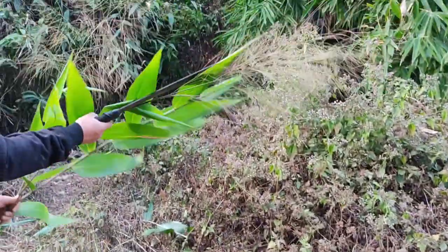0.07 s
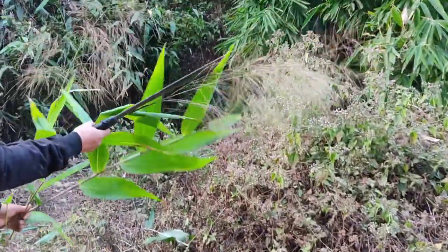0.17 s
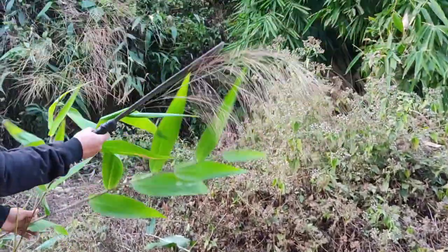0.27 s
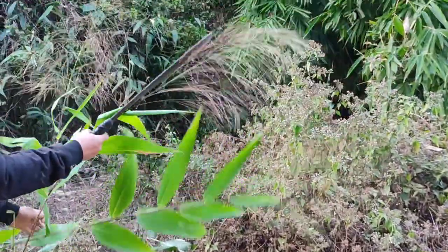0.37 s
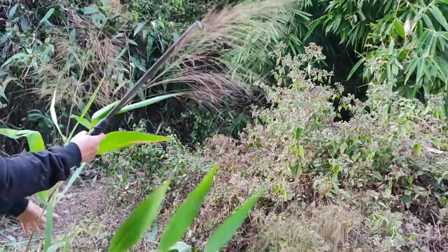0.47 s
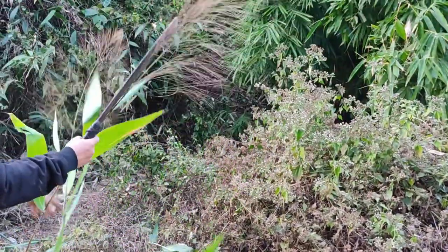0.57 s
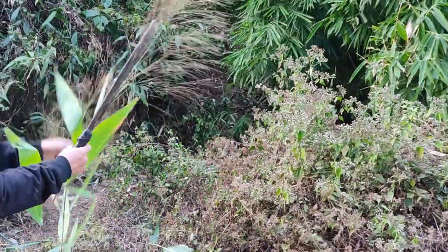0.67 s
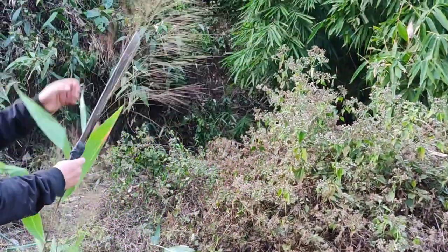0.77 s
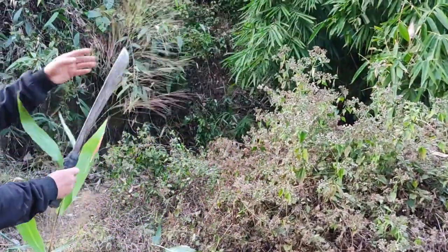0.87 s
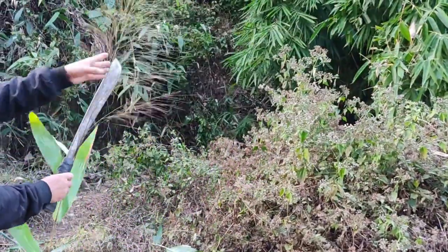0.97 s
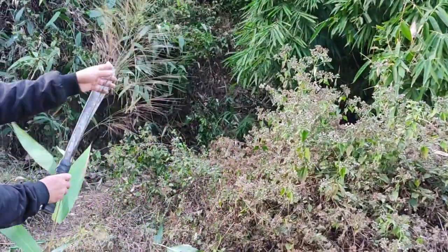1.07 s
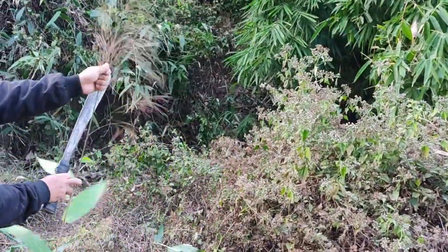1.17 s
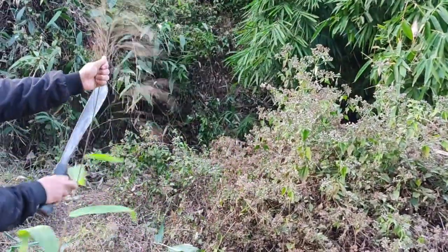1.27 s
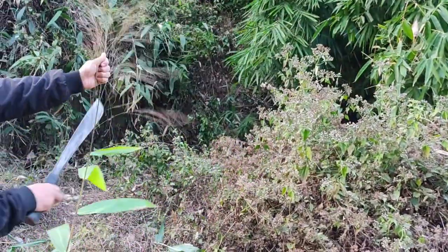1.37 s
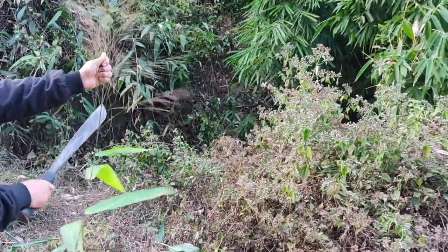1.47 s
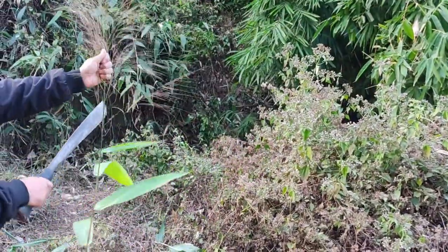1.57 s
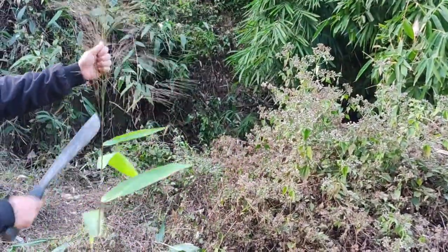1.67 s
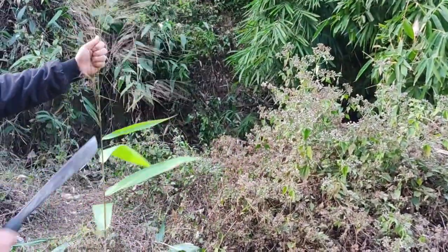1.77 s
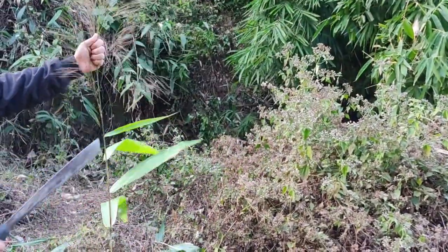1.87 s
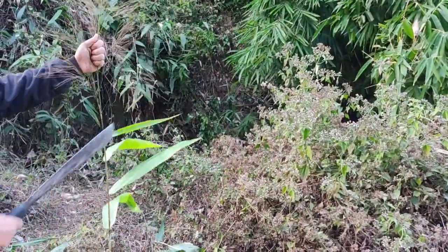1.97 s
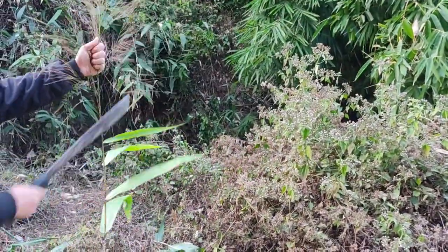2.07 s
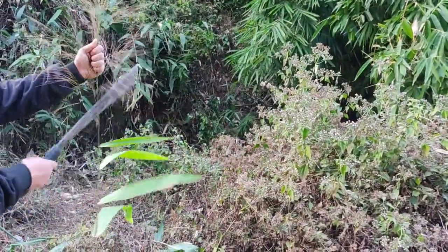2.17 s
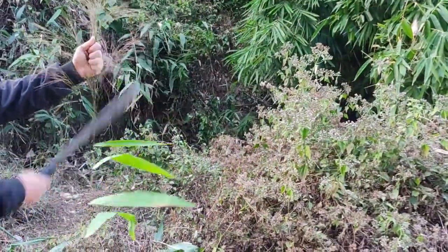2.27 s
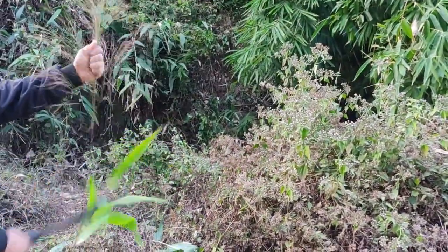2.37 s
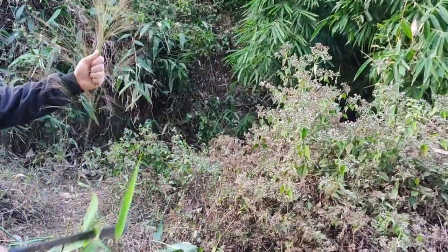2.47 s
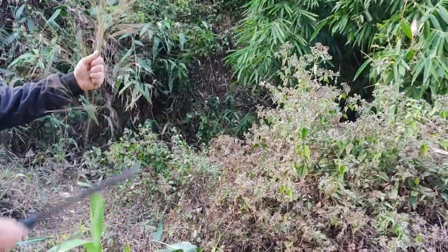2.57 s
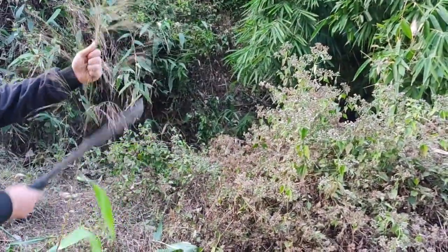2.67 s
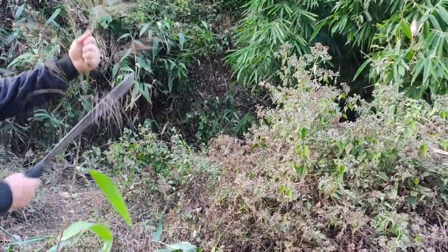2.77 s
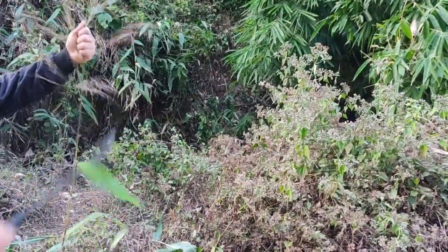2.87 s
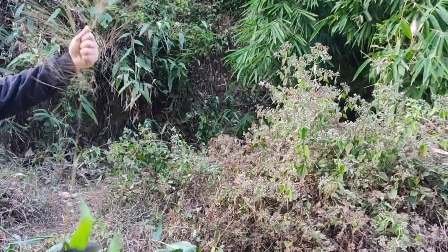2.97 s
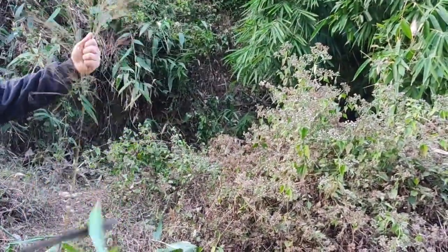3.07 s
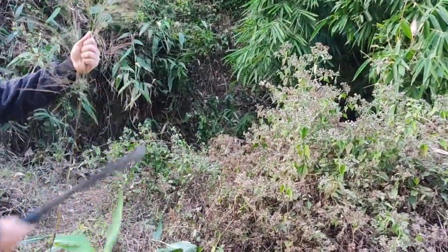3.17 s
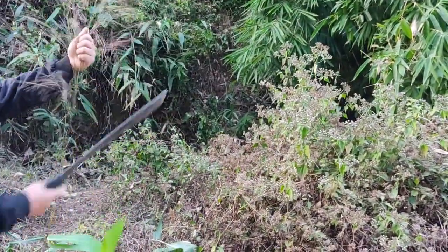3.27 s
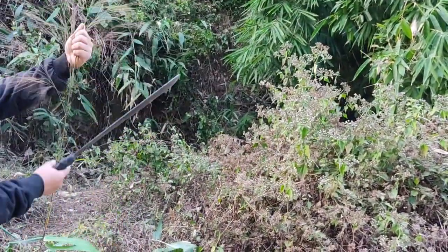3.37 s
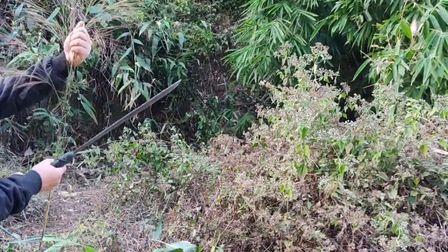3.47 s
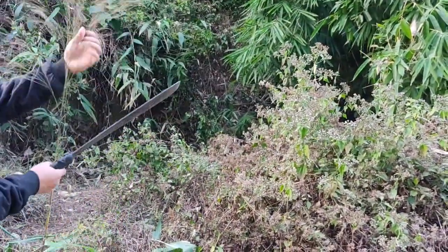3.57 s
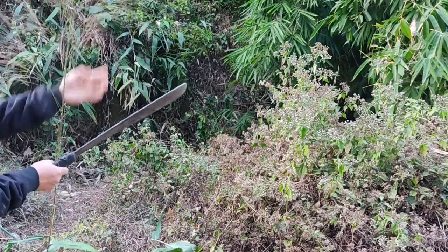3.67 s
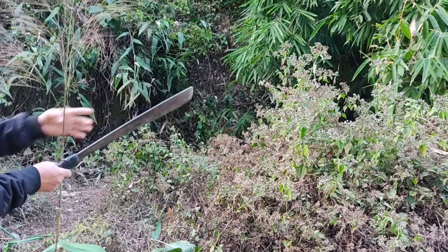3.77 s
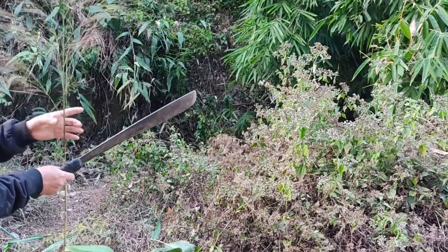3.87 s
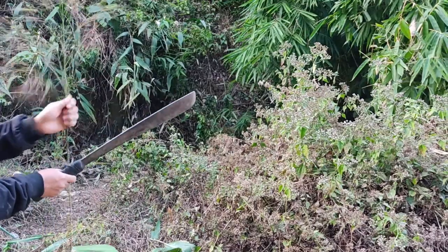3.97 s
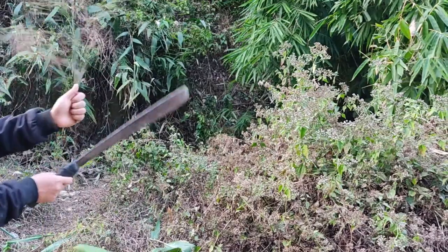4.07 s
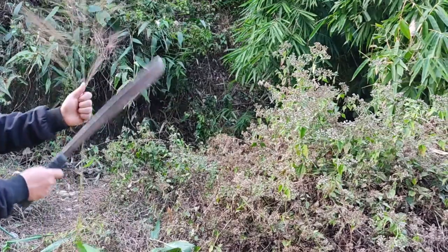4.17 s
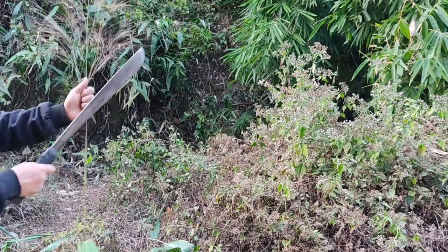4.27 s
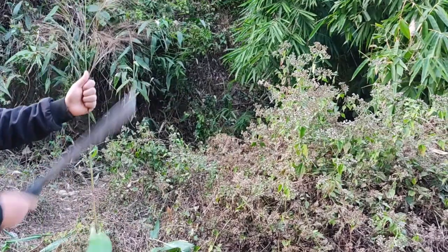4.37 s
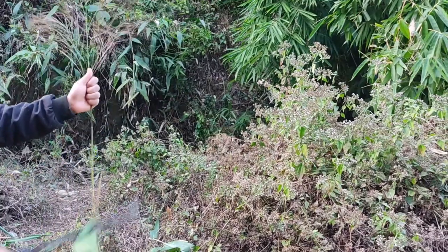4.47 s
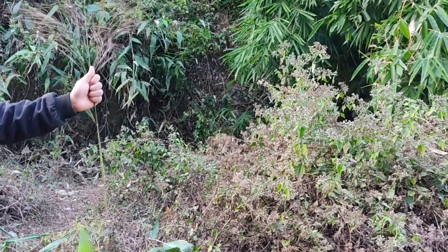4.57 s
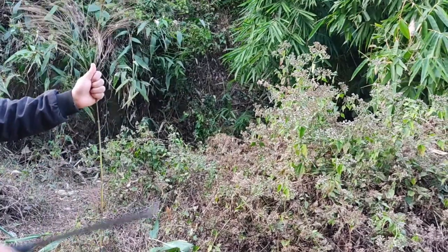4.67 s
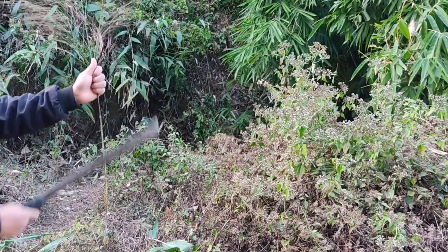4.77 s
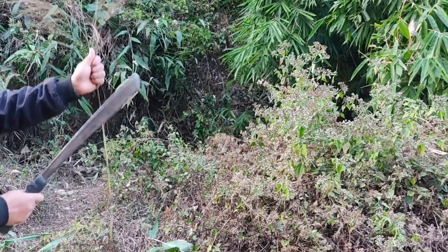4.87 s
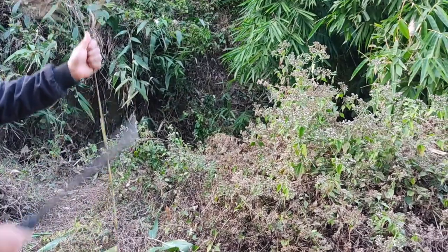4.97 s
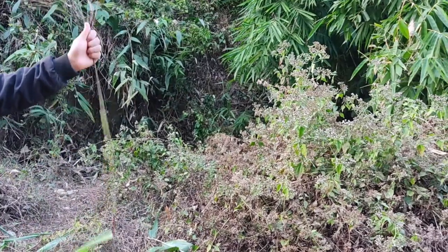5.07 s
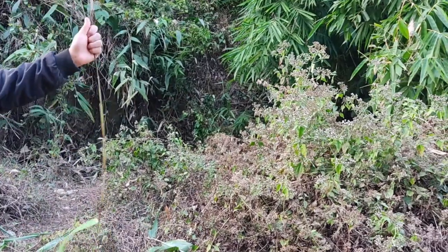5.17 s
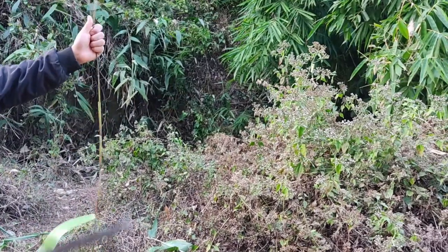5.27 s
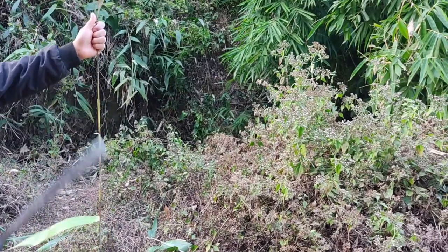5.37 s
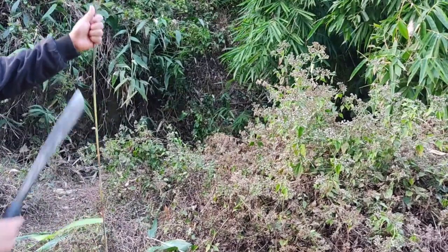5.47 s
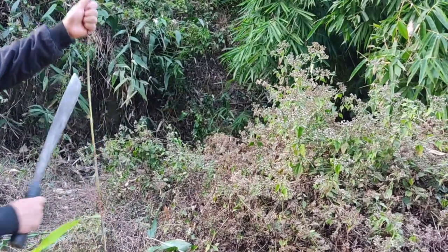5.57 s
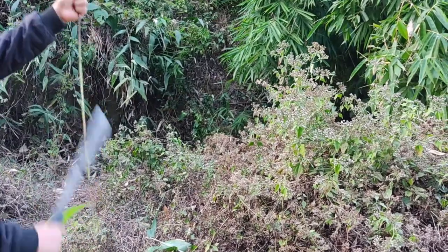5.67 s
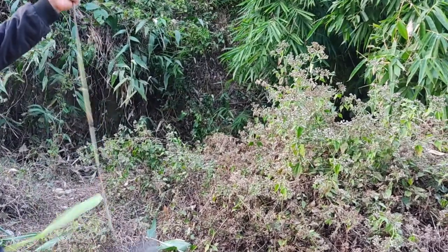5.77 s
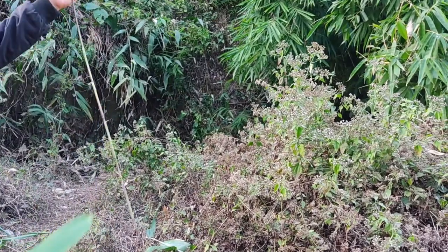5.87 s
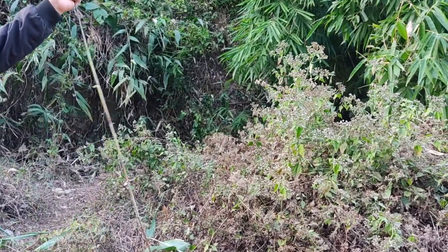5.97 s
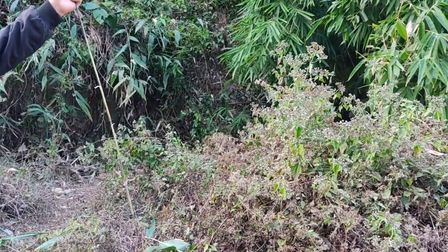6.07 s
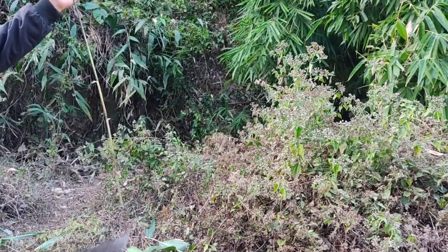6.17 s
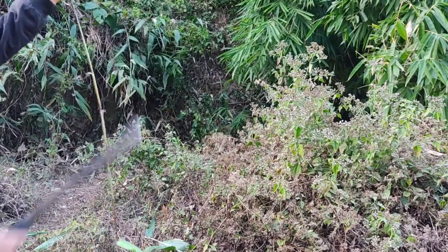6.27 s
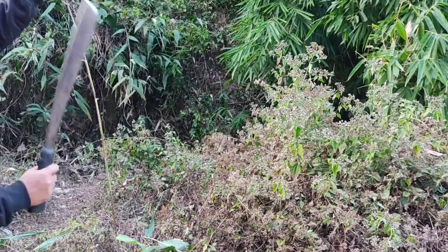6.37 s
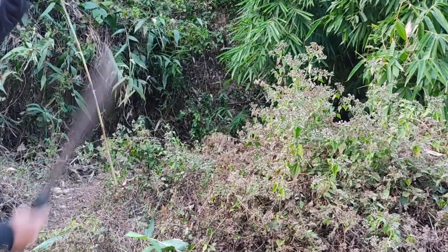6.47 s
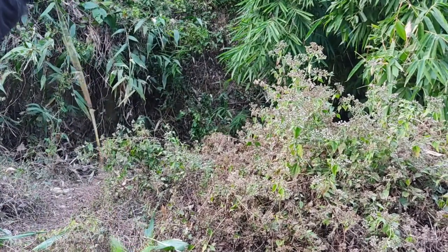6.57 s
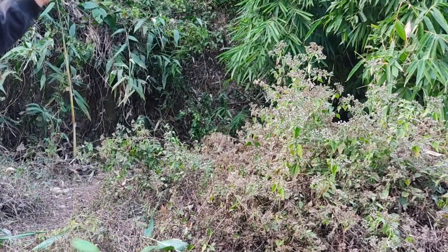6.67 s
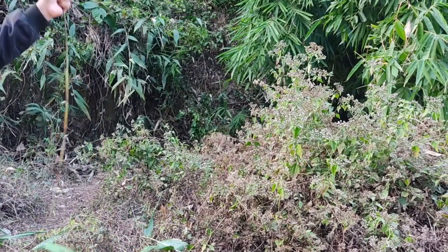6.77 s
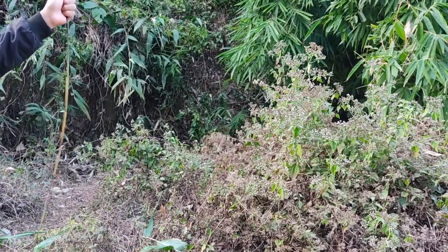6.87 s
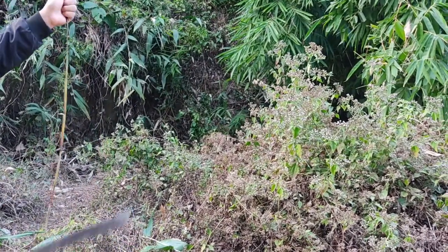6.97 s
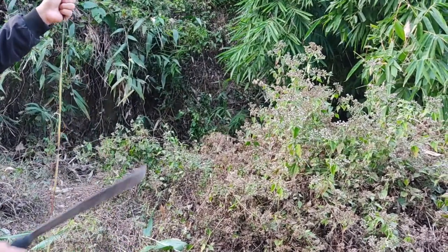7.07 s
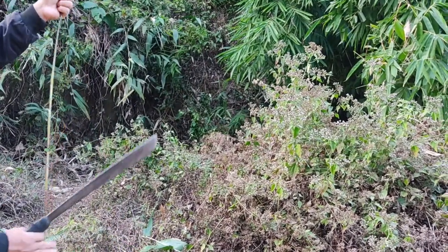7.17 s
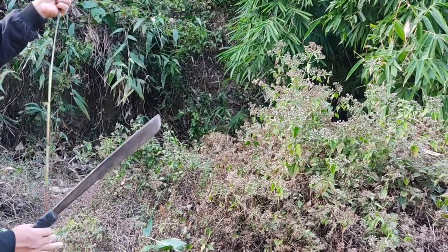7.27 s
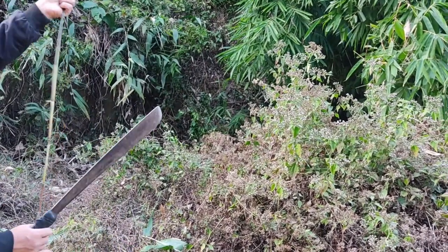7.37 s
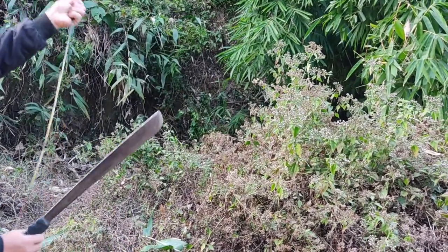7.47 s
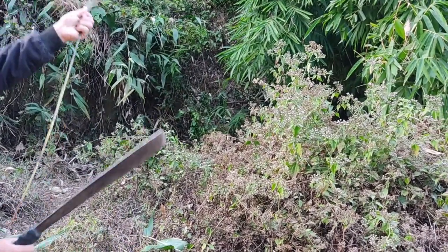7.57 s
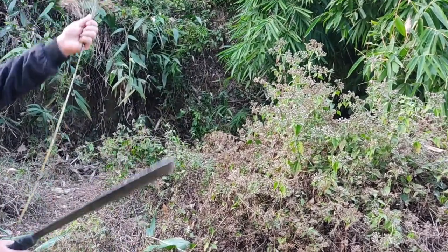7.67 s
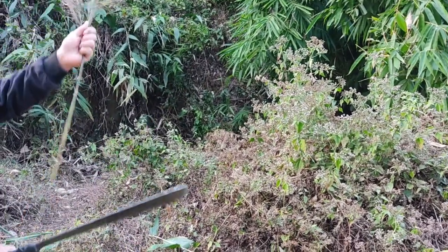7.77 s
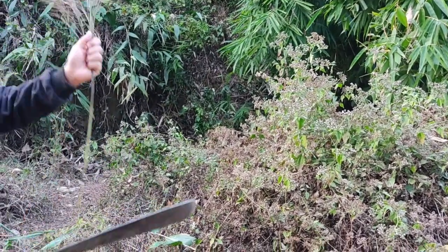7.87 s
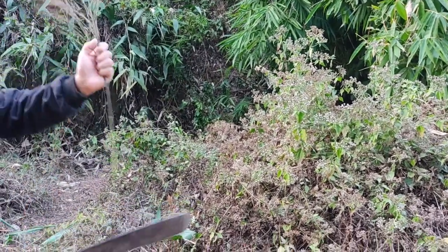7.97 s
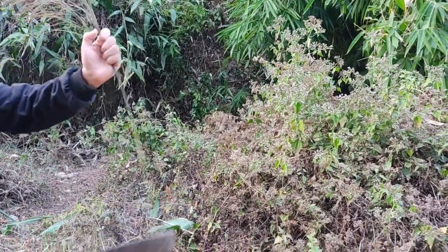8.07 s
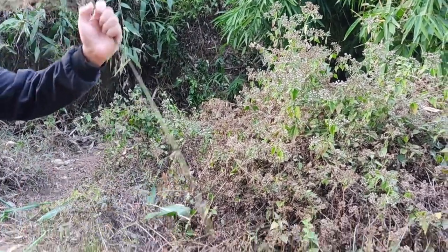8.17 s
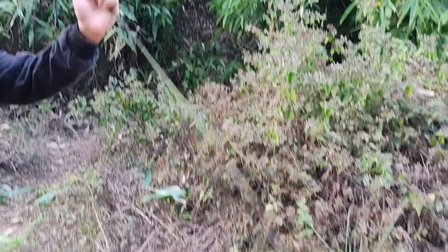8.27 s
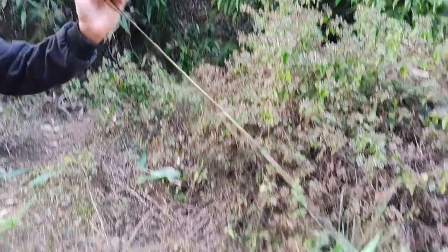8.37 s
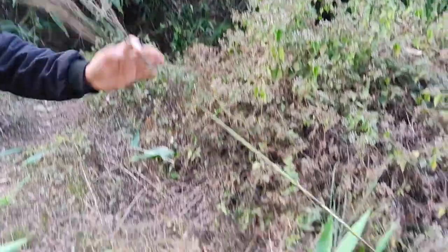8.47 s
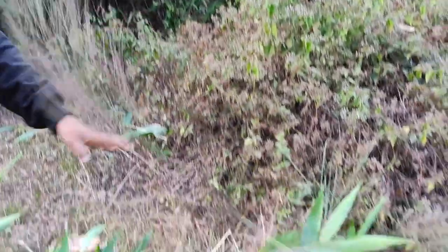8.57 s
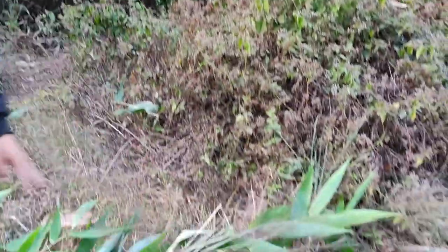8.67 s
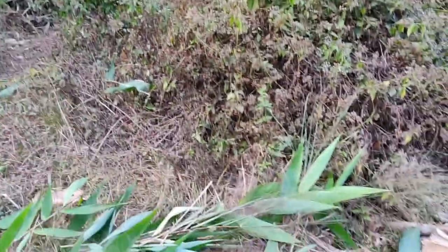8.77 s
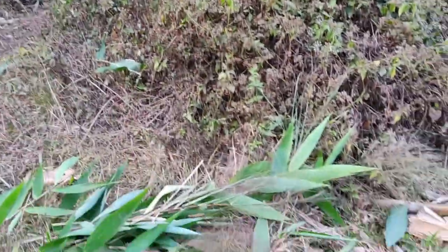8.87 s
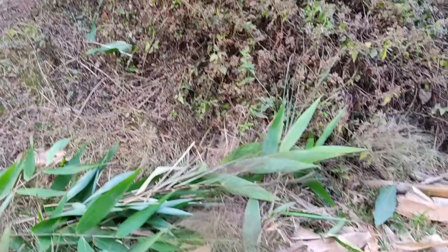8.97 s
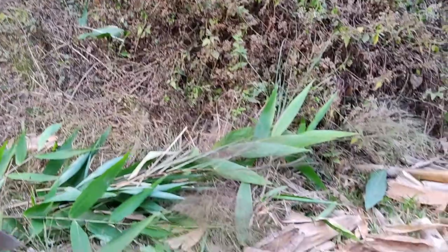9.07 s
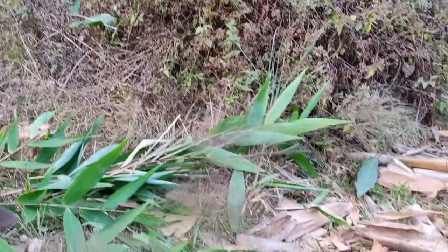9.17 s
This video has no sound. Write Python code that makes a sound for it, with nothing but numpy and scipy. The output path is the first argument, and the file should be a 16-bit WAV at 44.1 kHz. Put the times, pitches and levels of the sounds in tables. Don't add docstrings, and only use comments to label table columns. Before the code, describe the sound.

At a wood's edge, crickets sing in double chirps, fast trills and a lower drone above a faint insect chorus and soft wind rumble. Near the stereo phone microphone, leaves swish first, then a blade bites grass in short, dry, crunchy strikes. Two bursts of chopping are separated by quiet ticks; scattered later cuts give way to a thrown stalk rustling and knocking as it falls. Very little echo, only a short scatter from the bushes.

```python
import sys
import numpy as np
from scipy import signal
from scipy.fft import rfft, irfft, next_fast_len
from scipy.io import wavfile
from scipy.ndimage import uniform_filter1d, map_coordinates

SR = 44100
rng = np.random.default_rng(int(sys.argv[2]) if len(sys.argv) > 2 else 0)


def generate_wav(signal):
    frames = np.transpose(np.atleast_2d(signal))
    scaled = np.clip(frames, -1, 1) * 32767
    pcm = np.round(scaled).astype(np.int16)
    wavfile.write(sys.argv[1], SR, pcm)


def volts_from_db(level):
    exponent = np.asarray(level, float) / 20
    return 10 ** exponent


N = 406602

# pitch_hz, level_db [dB per Hz]
LEAF_COLOUR = [(2060, -52.5), (3500, -13), (4150, -15), (4910, -9), (5420, -11.5), (6460, -3.5),
               (7270, 0.5), (8790, -5.5), (9350, -14), (9900, -25), (11500, -24.5), (15000, -48.5),
               (22000, -120)]
# pitch_hz, level_db [dB per Hz]
STEM_COLOUR = [(50, -41), (130, -16.5), (386, -5.5), (606, -11), (827, -4), (1400, -6), (2380, -.3),
               (3300, -4), (4130, -9), (5000, -23), (6500, -44)]


def unit(x):
    return x / np.sqrt(np.mean(x ** 2) + 1e-20)


def along(points, hz):
    f, v = np.transpose(points)
    return np.interp(np.log(hz + 1), np.log(f + 1), v)


def wobble(rate):
    knots = rng.standard_normal(int(N * rate / SR) + 4)
    return map_coordinates(knots, [np.arange(N) * rate / SR])


def filtered(x, response):
    m = next_fast_len(N + 8192)
    return irfft(rfft(x, m) * response(np.fft.rfftfreq(m, 1 / SR)), m)[..., :N]


def causal(x, spectrum):
    gain = volts_from_db(along(spectrum, np.fft.rfftfreq(2048, 1 / SR)))
    c = irfft(np.log(gain + 1e-4))
    c[1:1024] *= 2
    c[1025:] = 0
    h = irfft(np.exp(rfft(c)))
    return signal.fftconvolve(x, h / np.linalg.norm(h))[:N]


def patches(x, size, bins, frames, patchy_db):
    z = signal.stft(x, nperseg=size)[2]
    field = uniform_filter1d(rng.standard_normal(z.shape[-2:]), bins, 0)
    field = uniform_filter1d(field, frames, 1)
    uneven = z * volts_from_db(patchy_db * unit(field))
    return unit(signal.istft(uneven, nperseg=size)[1][..., :N])


def air(spectrum, patchy_db):
    pair = patches(rng.standard_normal((2, N)), size=512, bins=5, frames=10, patchy_db=patchy_db)
    return unit(filtered(pair, lambda hz: volts_from_db(along(spectrum, hz))))


def wood():
    # pitch_hz, level_db [dB per Hz]
    chorus_colour = [(15, -38), (25, 4.5), (97, -4), (140, -10.5), (300, -8.5), (680, -17), (1300, -23),
                     (2300, -21.5), (4150, -22.5), (5100, -11.5), (5500, -1.5), (6200, -4.5), (7300, -13.5),
                     (9200, -27.5), (9900, -39), (12000, -41), (16000, -55.5)]
    # pitch_hz, level_db [dB per Hz]
    gust_colour = [(24, -27), (40, -9.5), (140, -4), (171, 1.5), (368, -3.5), (800, -10), (1500, -28),
                   (2640, -120)]
    # time_s, level_db
    wind_level = [(0, -66.5), (.54, -77), (1.08, -72), (1.4, -78), (2.31, -79), (2.54, -66.5), (2.7, -81),
                  (3.15, -74), (3.33, -78), (3.46, -71), (3.62, -79), (5.16, -70.5), (5.37, -80.5),
                  (6.3, -80), (6.91, -73), (7.37, -78), (8.2, -79), (8.35, -72), (8.6, -72), (8.95, -72),
                  (9.22, -67)]
    gust_db = np.interp(np.arange(N) / SR, *np.transpose(wind_level))
    chorus = volts_from_db(-65.5 + 1.1 * wobble(2.105)) * air(chorus_colour, patchy_db=1.5)
    gusts = volts_from_db(gust_db + 2.8 * wobble(8)) * air(gust_colour, patchy_db=2.5)
    return chorus + gusts


def chirps(times, db, top_hz, fall_hz, length, teeth, vary_db):
    out = np.zeros(N + SR)
    u = np.arange(round(length * SR)) / SR
    throb = 1 + teeth * np.cos(2 * np.pi * 82 * u)
    swell = np.sin(np.pi * u / length) ** .8 * throb
    for s, g, (jitter, size) in zip(times, db, rng.normal(size=(len(times), 2))):
        phase = 2 * np.pi * ((top_hz + 20 * jitter) * u - fall_hz * u * u / length / 2)
        start = max(round((s - length / 2) * SR), 0)
        out[start:][:len(u)] += volts_from_db(g + vary_db * size) * swell * np.sin(phase)
    return out[:N]


def phrases(table):
    rows = [(s, db) for a, b, period, db in table for s in np.arange(a, b, period)]
    return np.transpose(rows)


def from_side(x, late):
    return np.array([np.roll(x, late), x])


def crickets():
    # first_s, chirps [count]
    sweep_runs = [
        (.145, 1),
        (.429, 3),
        (1.486, 5),
        (2.785, 5),
        (4.097, 2),
        (4.615, 2),
        (5.417, 8),
        (7.883, 4),
    ]
    # first_s, last_s, period_s, level_db
    trill_phrases = [
        (.016, .83, .0495, -61),
        (1.724, 2.87, .0492, -60),
        (3.862, 5.0, .0492, -61),
        (6.046, 7.44, .0488, -62),
        (8.236, 9.2, .0487, -61),
    ]
    # first_s, last_s, period_s, level_db
    drone_phrases = [
        (0, 1.3, 0.068, -68.5),
        (1.87, 3.2, 0.044, -69.5),
        (3.62, 5.0, 0.057, -70.5),
        (5.4, 6.4, 0.063, -70.5),
        (6.95, 8.2, .0497, -71.5),
        (8.31, 9.2, 0.071, -75),
    ]
    gap_s, tiring_s = .246, .0022
    first = [s + gap_s * k + tiring_s * k * k for s, count in sweep_runs for k in range(count)]
    first = np.array(first) - .0065
    sweeps = np.concatenate([first, first + .0465])
    near = chirps(sweeps, np.full(len(sweeps), -57), top_hz=5330, fall_hz=950, length=.026,
                  teeth=0, vary_db=.6)
    near += chirps(first - .048, np.full(len(first), -73), top_hz=4650, fall_hz=300, length=.012,
                   teeth=0, vary_db=2)
    trill = chirps(*phrases(trill_phrases), top_hz=5910, fall_hz=220, length=.043, teeth=.4, vary_db=1.3)
    drone = chirps(*phrases(drone_phrases), top_hz=5410, fall_hz=100, length=.034, teeth=.3, vary_db=1.5)
    return from_side(near, 7) + volts_from_db(-2.3) * from_side(trill, 7) + volts_from_db(3) * from_side(drone, 1)


def bushes(x):
    # pitch_hz, fade_s
    fade_times = [
        (200, 0.21),
        (2000, 0.2),
        (10000, 0.11),
    ]
    hz, t, z = signal.stft(rng.standard_normal((2, SR // 4)), SR, nperseg=256)
    fading = volts_from_db(-60 * t / along(fade_times, hz)[:, None])
    tail = signal.istft(z * fading, SR, nperseg=256)[1]
    delayed = np.pad(x, (200, 0))[None]
    return signal.fftconvolve(delayed, tail / np.linalg.norm(tail[0]), axes=1)[:, :N]


def breaks(spread_db, clump_db, colour_db):
    size = volts_from_db(spread_db * rng.exponential(size=N).clip(0, 7) + clump_db * wobble(350))
    grains = size * rng.standard_normal(N)
    return patches(grains, size=128, bins=3, frames=3, patchy_db=colour_db)


def sways():
    # peak_s, level_db, stem_db, rise_s [to rise 20 dB], fall_s [to fall 20 dB]
    shakes = [(.09, -48, -12, .8, .8), (.48, -58, -19, .5, .3), (.96, -46, -10, .15, .33),
              (1.5, -72, -8, .5, .5), (1.87, -61, -10, .32, .45), (2.52, -44, -13, .18, .07),
              (2.89, -62, -15, .28, .1), (3.04, -44, -12, .16, .14), (3.35, -70, -7, .5, .45),
              (4.03, -63, -26, .2, .5), (4.156, -62, -11, .2, .22), (4.44, -69, -8, .6, .1),
              (4.546, -47.5, -13, .08, .2), (4.85, -70, -9, .9, .9), (5.08, -53, -11, .18, .2),
              (5.3, -68, -9, .3, .8), (5.9, -75, -11, 2.2, 2.2), (6.414, -56.5, -14, .11, .36),
              (6.7, -56, -11, .1, .4), (7.12, -69.5, -5, .5, .35), (8.12, -74, -9, .45, .9),
              (8.426, -64, -6, .3, .9), (8.83, -48, -11, .01, .3), (9.126, -50, -12, .3, .8)]
    t = np.arange(0, N, 64) / SR

    def share(stem_db):
        return volts_from_db(np.array([[0], [stem_db], [-27.5]]))

    power = (share(-5) * volts_from_db(-83)) ** 2
    for s, db, stem_db, rise, fall in shakes:
        away = np.where(t < s, (s - t) / rise, (t - s) / fall)
        power = power + (share(stem_db) * volts_from_db(db - 20 * away)) ** 2
    return np.array([np.interp(np.arange(N) / SR, t, force) for force in np.sqrt(power)])


def contacts():
    # start_s, level_db, drag_s, fade_s [to fall 60 dB]
    chops = [(.8122, -46.2, .0048, .06), (.825, -45, .0071, .13), (2.3703, -39, .003, .012),
             (2.3885, -33, .003, .03), (2.3995, -41, .018, .03), (2.42, -28, .008, .031),
             (2.436, -37, .028, .02), (2.4661, -24, .0083, .045), (2.482, -34, .016, .05),
             (2.5512, -40, .0037, .023), (2.8812, -46, .0079, .035), (3.0214, -31, .012, .05),
             (3.04, -42, .035, .05), (4.514, -39, .011, .02), (5.7648, -31, .002, .012),
             (5.769, -36, .004, .02), (5.784, -30, .008, .02), (5.8, -46, .012, .07),
             (5.8773, -46.6, .0037, .038), (6.6635, -33, .006, .02), (6.674, -34, .009, .03)]
    # start_s, level_db, drag_s, fade_s
    bites = [
        (2.9485, -35, .012, .071),
        (5.081, -32, .0073, .019),
        (5.1259, -30, .0055, .021),
    ]
    # start_s, level_db, drag_s, fade_s
    slices = [
        (2.619, -43, .0026, .024),
        (4.556, -23, .013, .02),
        (4.695, -42, .0078, .031),
        (6.389, -43.5, .0038, .026),
        (6.6461, -36.5, .0045, .057),
        (6.802, -37, .002, .008),
        (8.83, -31.5, .015, .088),
    ]
    # start_s, level_db, drag_s, fade_s
    scrapes = [
        (.0474, -45, .017, .046),
        (4.474, -31, .016, .054),
        (4.492, -34.5, .032, .011),
        (5.0484, -41.5, .0089, .042),
        (6.6161, -32.5, .006, .052),
        (7.28, -50, .01, .064),
    ]
    # start_s, level_db, drag_s
    brushes = [(.262, -48.5, .0155), (.296, -47, .006), (.3577, -53, .023), (.4309, -48, .009),
               (.6875, -56.5, .013), (.842, -40.5, .02), (.858, -41, .018), (.886, -38, .033),
               (1.006, -48.5, .018), (1.14, -55.5, .014), (1.2292, -57, .012), (1.2966, -58, .01),
               (1.4881, -65.5, .009), (1.8957, -62, .011), (2.635, -53, .013), (2.9742, -34, .03),
               (3.18, -55, .016), (6.462, -51.5, .02), (6.7033, -52, .015), (7.1323, -68, .013),
               (7.5808, -66, .01), (8.24, -66, .05), (9.1756, -53, .015)]
    # start_s, level_db, drag_s
    grazes = [
        (5.86, -66, .004),
        (6.207, -70, .004),
        (7.3231, -65, .012),
        (7.4304, -72, .008),
        (7.7, -68, .02),
        (8.28, -70, .02),
    ]
    # start_s, level_db, stem_db
    ticks = [(.122, -44, -20), (.1781, -60, 5), (.7872, -55, -16.7), (1.614, -65.5, -7),
             (1.6478, -64.3, -4), (1.731, -63, 1.2), (2.0723, -72, 5.5), (2.9206, -48.5, -9),
             (3.7975, -53.5, -16.5), (3.8273, -60, -14.5), (4.115, -55.5, -9.5), (4.1476, -62, -4.5),
             (4.2623, -59, -13), (4.324, -58, .6), (4.837, -58, -1.1), (5.0061, -46.5, -11.5),
             (5.0314, -53, 3), (6.0687, -61.5, -25), (6.36, -50.5, -13), (6.817, -49, -3),
             (7.249, -59, -15), (8.8245, -46, -1.5)]
    # start_s, level_db, stem_db
    clicks = [(1.6716, -56.5, -2.1), (2.9313, -57.5, 15.5), (4.2182, -43.5, -15), (4.2274, -58, -4.9),
              (4.459, -43.5, 5.5), (5.1097, -52, 6), (5.275, -47, 1.5), (5.3929, -54, -22),
              (5.5865, -53, -9), (5.6093, -59.5, 3), (5.659, -68.5, 7.5), (7.2104, -62, 9),
              (8.9272, -52, -2.5)]
    rings = 4.5
    return ([(s, db, -10, -28.5, drag, fade) for s, db, drag, fade in chops]
            + [(s, db, -3.5, -21, drag, fade) for s, db, drag, fade in bites]
            + [(s, db, -15, -28, drag, fade) for s, db, drag, fade in slices]
            + [(s, db, -10, -12.5, drag, fade) for s, db, drag, fade in scrapes]
            + [(s, db, -10, -28.5, drag, rings * drag) for s, db, drag in brushes]
            + [(s, db, -8, -8, drag, rings * drag) for s, db, drag in grazes]
            + [(s, db, stem_db, -24, .0035, .047) for s, db, stem_db in ticks]
            + [(s, db, stem_db, -30, .003, .017) for s, db, stem_db in clicks])


def strokes():
    flicks = unit(volts_from_db(1.7 * wobble(60)))
    power = (flicks * volts_from_db(1.2) * sways()) ** 2
    u = np.arange(SR // 4) / SR
    for s, db, stem_db, edge_db, drag, fade in contacts():
        build = 1 - np.exp(-u / (0.11 * drag))
        die = volts_from_db(-60 * np.maximum(u - drag, 0) / (1.22 * fade))
        crack = 1 + 1.1 * np.exp(-u / 0.0014) * min(0.0041 / drag, 1)
        shape = build * die * crack
        part = power[:, round(s * SR):][:, :len(u)]
        levels = volts_from_db(db - 0.3 + np.array([[0], [stem_db], [edge_db]]))
        part += (levels * shape[:part.shape[1]]) ** 2
    return np.sqrt(power)


def knocks():
    # start_s, peak_db, pitch_hz
    stalk_blows = [(.047, -52, 213), (.177, -50.5, 230), (.433, -45, 1120), (1.024, -38, 270),
                   (2.39, -32, 1120), (2.422, -35, 816), (2.466, -39, 1300), (2.88, -58, 1016),
                   (2.95, -36, 420), (3.015, -38, 813), (4.326, -53, 970), (4.459, -50, 756),
                   (4.56, -45, 370), (4.839, -49, 250), (5.033, -39.5, 1094), (5.084, -36, 1060),
                   (5.127, -34, 1160), (5.274, -39, 885), (5.767, -41, 1270), (5.768, -40, 301),
                   (5.787, -34, 790), (6.36, -55, 247), (6.664, -42, 382), (6.815, -40.5, 904),
                   (7.282, -41, 772), (7.582, -57, 939)]
    # start_s, peak_db, pitch_hz
    landing_blows = [(8.824, -37, 930), (8.827, -41, 480), (8.84, -42, 1250), (8.845, -44, 330),
                     (8.835, -39, 800), (8.853, -41, 1000), (8.862, -49, 260), (8.88, -48, 1150),
                     (8.927, -48.5, 390), (9.043, -38, 620), (9.059, -39, 412), (9.061, -39, 680),
                     (9.089, -47, 685), (9.103, -47, 560), (9.12, -50, 650)]
    # start_s, peak_db, pitch_hz
    twig_snaps = [
        (2.9307, -29, 2100),
        (5.2749, -39, 1900),
        (5.587, -35, 2760),
        (5.7688, -23, 1870),
        (7.209, -52, 1300),
        (4.326, -48, 1800),
        (.435, -43, 2900),
        (.179, -46, 2300),
        (.056, -44, 2400),
        (7.582, -56, 1500),
    ]
    blows = []
    for table, fade_s in ((stalk_blows, .033), (landing_blows, .045), (twig_snaps, .016)):
        blows += [(*row, fade_s) for row in table]
    out, u = np.zeros(N + SR), np.arange(SR // 8) / SR
    for (s, db, hz, fade_s), (a, b) in zip(blows, rng.uniform(size=(len(blows), 2))):
        turn = 2 * np.pi * hz * u
        note = np.sin(turn)
        note += .5 * np.sin(turn * (1.2 + .4 * a))
        note += 0.21 * np.sin(turn * (0.594 + 0.233 * b))
        onset = 1 - np.exp(-u / 0.0013)
        out[round(s * SR):][:len(u)] += volts_from_db(db - 3 - 60 * u / fade_s) * onset * note
    return out[:N] * volts_from_db(3 * wobble(250))


def cracks():
    # start_s, peak_db
    fibre_snaps = [(0.0576, -30), (0.1269, -34), (0.213, -39), (0.2772, -35), (0.442, -38), (0.5447, -35),
                   (0.6895, -45), (0.7051, -44), (0.7873, -39), (0.8131, -37), (0.8571, -26), (0.893, -29),
                   (0.9005, -29), (0.9654, -37), (1.2428, -44), (1.2469, -46), (1.2981, -48), (1.4978, -50),
                   (1.6161, -53), (1.6725, -51), (1.7234, -47), (2.3708, -28), (2.3759, -41), (2.3911, -19),
                   (2.4066, -28), (2.423, -22), (2.4716, -17), (2.5514, -30), (2.5558, -36), (2.5794, -41),
                   (2.6215, -32), (2.6487, -41), (2.8809, -39), (2.886, -38), (2.9002, -40), (2.923, -38),
                   (2.9799, -25), (2.9871, -25), (3.0064, -23), (3.0273, -22), (3.0547, -28),
                   (3.8008, -48), (3.8109, -50), (3.8279, -48), (3.9707, -51), (4.1396, -46),
                    (4.2191, -36), (4.2287, -47), (4.2633, -47), (4.4599, -41), (4.4642, -40),
                    (4.4781, -23), (4.5249, -21), (4.5572, -23), (4.5621, -14), (4.5662, -15),
                    (4.6596, -43), (4.6721, -44), (4.6993, -33), (4.8383, -45), (5.0069, -40),
                    (5.0503, -34), (5.0718, -40), (5.0824, -22), (5.0857, -25), (5.1266, -23),
                    (5.1309, -27), (5.1414, -34), (5.1534, -40), (5.2759, -35), (5.393, -41), (5.5872, -50),
                    (5.7657, -19), (5.7887, -21), (5.8004, -27), (5.8439, -42), (5.8788, -37),
                    (5.9734, -52), (6.3615, -39), (6.3921, -36), (6.4668, -41), (6.6181, -27),
                    (6.6473, -27), (6.6653, -22), (6.6689, -22), (6.6772, -24), (6.6813, -20),
                    (6.7047, -39), (6.7162, -39), (6.8026, -24), (6.8187, -38), (7.2495, -47),
                    (7.2914, -38), (7.2996, -42), (8.8329, -26), (8.84, -22), (8.844, -23), (8.8625, -30),
                    (9.0602, -42), (9.1888, -38)]
    rows = fibre_snaps
    out, u = np.zeros(N + SR), np.arange(256) / SR
    bursts = rng.standard_normal((len(rows), len(u))) * volts_from_db(-10 - 60 * u / .008)
    bursts[:, 0] = np.sign(bursts[:, 0])
    for (s, db), burst in zip(rows, bursts):
        out[round(s * SR):][:len(u)] += volts_from_db(db + 6) * burst
    return causal(out[:N], LEAF_COLOUR) + volts_from_db(-15) * causal(out[:N], STEM_COLOUR)


def grass():
    # pitch_hz, level_db [dB per Hz]
    edge_colour = [(5590, -26), (9500, 9), (10300, -1), (14800, 11.5), (16200, -14)]
    leaf, stem, edge = strokes()
    sides = []
    for _ in range(2):
        snap = breaks(spread_db=1.6, clump_db=1.6, colour_db=3)
        body = 0.59 * snap + 0.83 * breaks(spread_db=1.5, clump_db=3.6, colour_db=5)
        swarm = causal(leaf * snap, LEAF_COLOUR)
        swarm += causal(stem * body, STEM_COLOUR)
        swarm += causal(edge * snap, edge_colour)
        sides.append(swarm)
    return sides[0] + knocks(), sides[1]


def ports(x, other, lag):
    # pitch_hz, share [0-1]
    alike = [
        (100, 0.4),
        (400, 0.91),
        (1500, 0.63),
        (5000, 0.42),
        (12000, 0),
    ]

    def blend(hz):
        turn = np.arccos(np.clip(along(alike, hz), 0, 1)) / 2
        return np.array([np.cos(turn), np.sin(turn)])

    def delay(hz):
        return np.exp(-1j * np.pi * hz * lag / SR * np.array([[1], [-1]]))

    same, apart = filtered(np.array([x, other]), blend)
    return filtered(np.array([same + apart, same - apart]), delay)


def scene():
    background = wood()
    insects = crickets()
    shared, scattered = grass()
    near = ports(shared, scattered, lag=4.8) + from_side(cracks(), 5)
    near[0] = np.where(np.arange(N) / SR < 8.8, near[0], np.roll(near[0], -16))
    scatter = bushes(volts_from_db(-20) * shared + volts_from_db(-10) * insects[0])
    return near + insects + scatter + background


def band_limit(x):
    return signal.sosfilt(signal.butter(12, 16000, fs=SR, output="sos"), x)


def record(dry):
    # pitch_hz, difference_db
    side_balance = [(60, 3), (330, 5), (1000, 2), (2100, -4.5), (3600, .3), (5000, 4), (6200, 1.2),
                    (7200, -7), (7900, .3), (8800, 9), (10300, 4), (15000, 3.5)]

    def shade(hz):
        tilt_db = along(side_balance, hz) / 2 * np.array([[1], [-1]])
        return volts_from_db(tilt_db) * (hz < 16200)

    mix = filtered(dry, shade)
    return band_limit(mix)


dry = scene()
out = record(dry)
generate_wav(out)
```